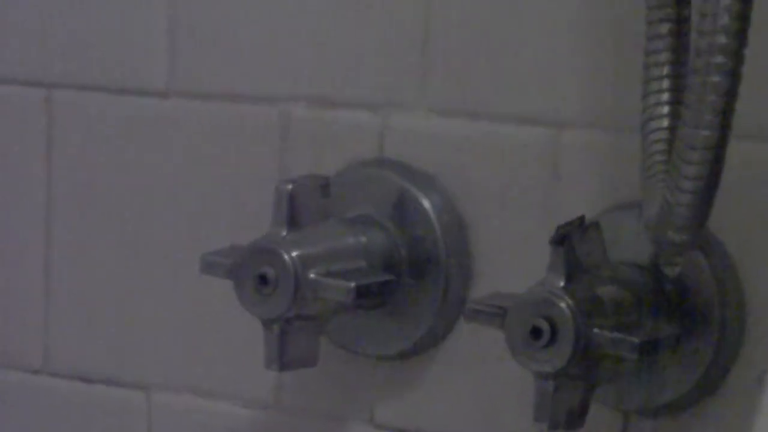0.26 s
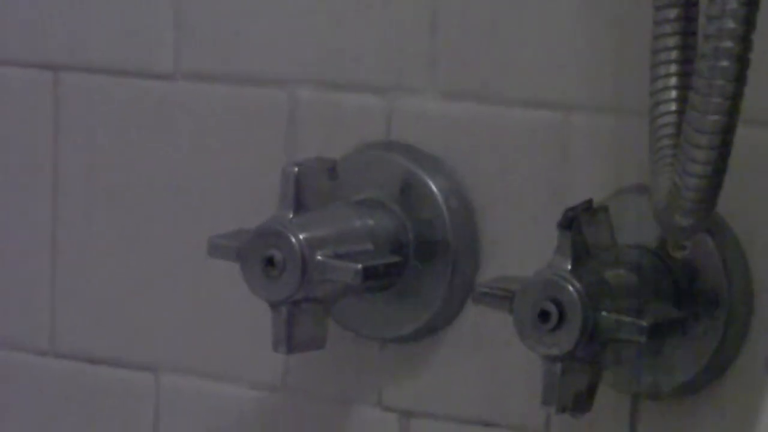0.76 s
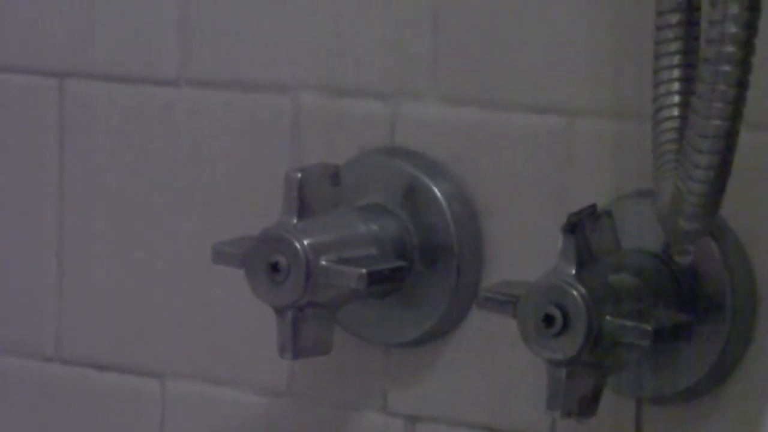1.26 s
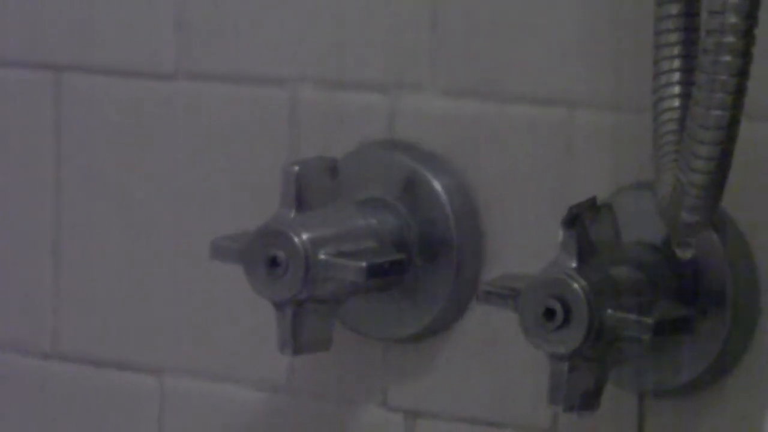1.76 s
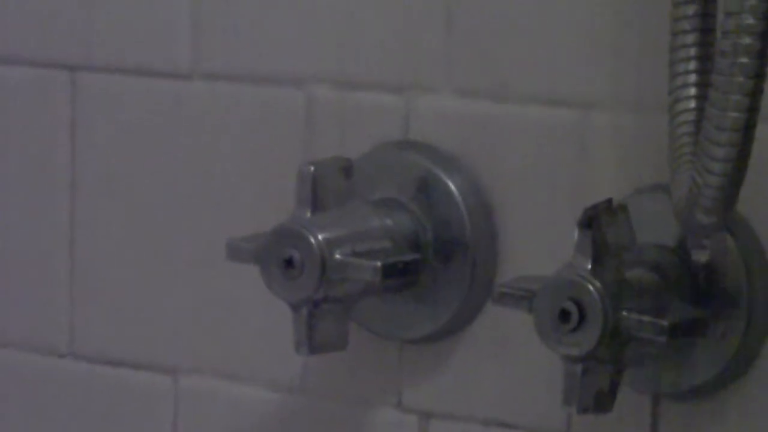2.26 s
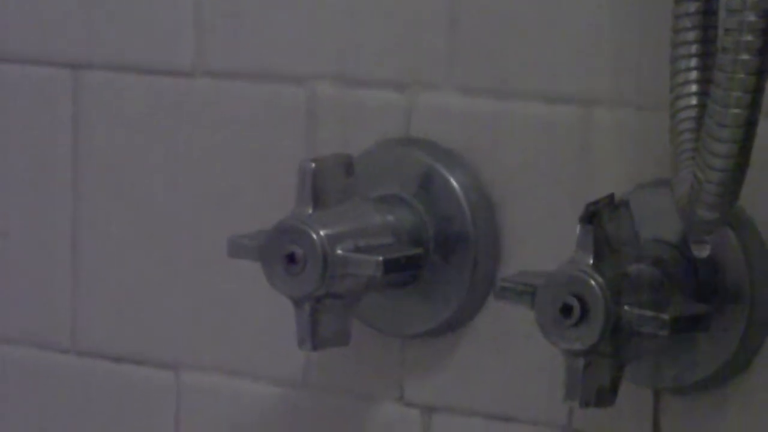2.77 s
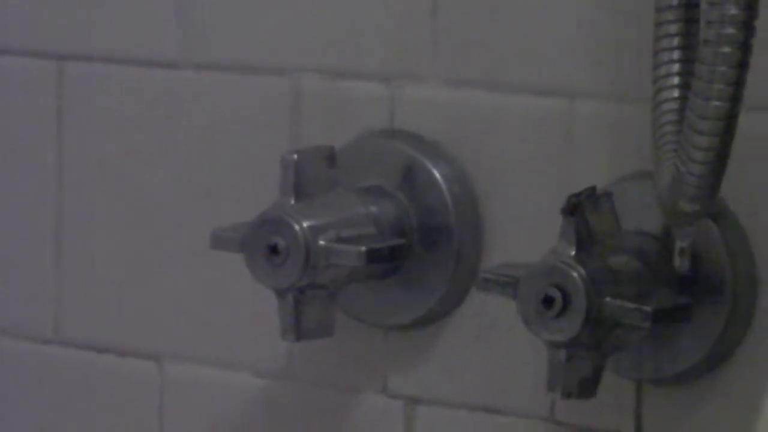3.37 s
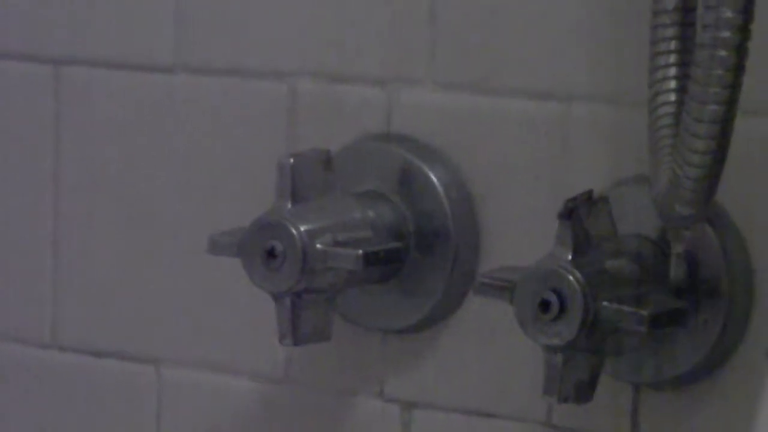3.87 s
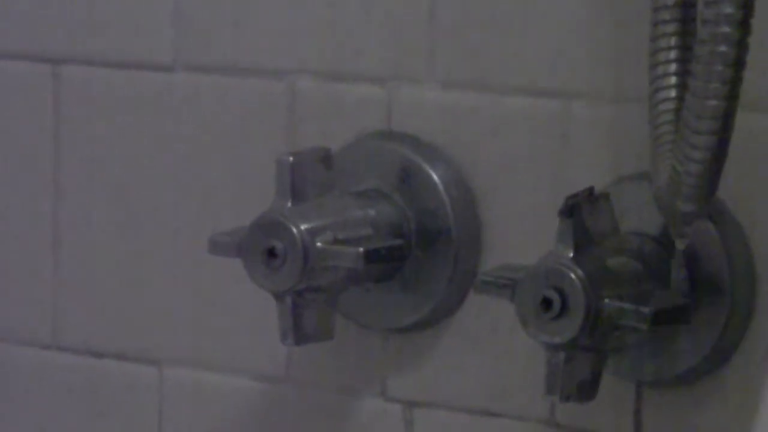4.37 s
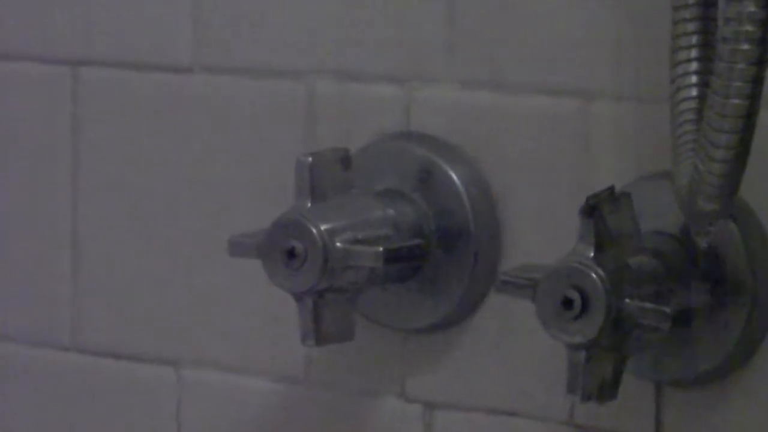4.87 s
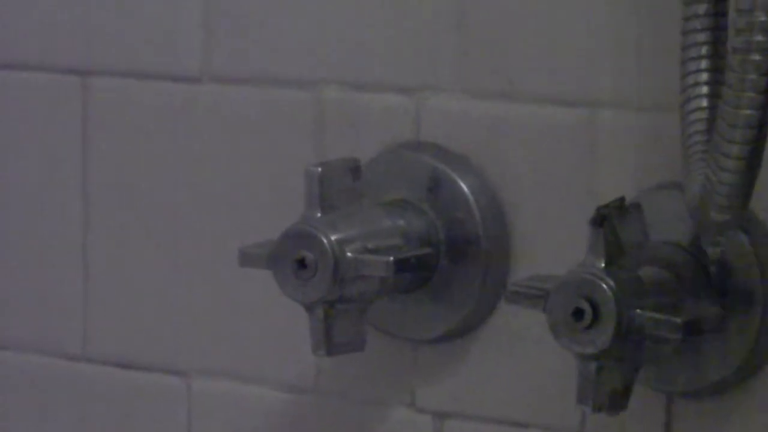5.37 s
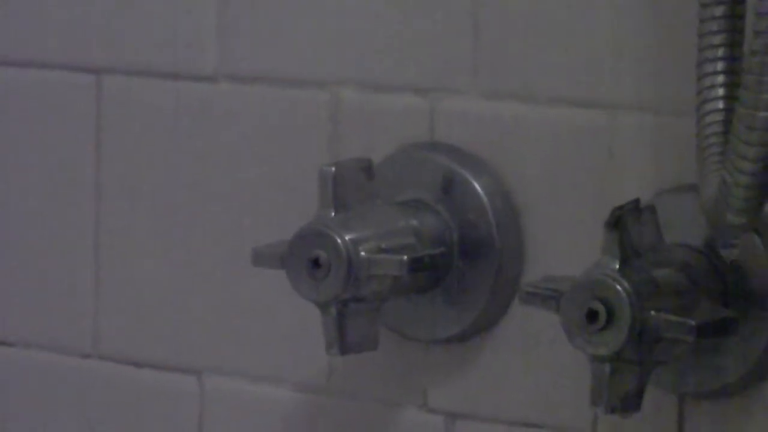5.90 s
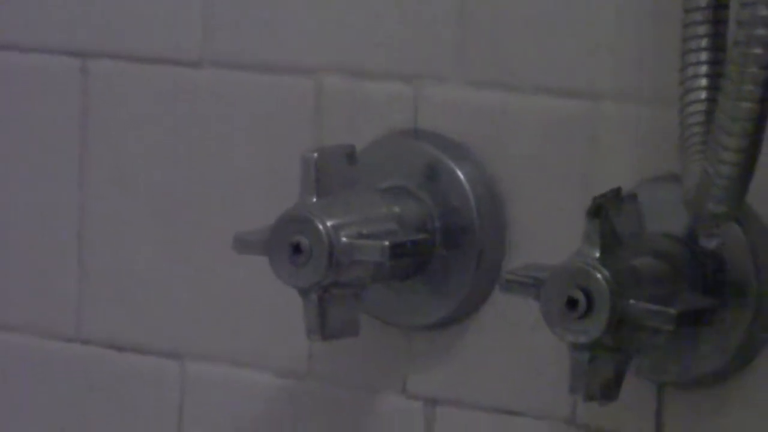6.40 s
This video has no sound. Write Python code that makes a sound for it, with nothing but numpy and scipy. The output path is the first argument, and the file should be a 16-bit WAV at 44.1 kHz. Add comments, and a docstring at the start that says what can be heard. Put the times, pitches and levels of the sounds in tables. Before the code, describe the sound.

Close, mono sound of water falling from a shower into a bathtub, with short hard echoes from tile walls smearing the spray into a hiss. Small bubbles splash, larger ones glug irregularly, and stray drops tick and plink. The stream stays steady for four seconds, then eases slightly, thinner and more gurgly, and continues running to the end without stopping.

```python
"""Shower into a tub

A shower runs into a tub in a small tiled bathroom, heard in mono from beside the taps.
Drops tick as random clicks, splash, and trap bubbles, decaying sines, in a puddle that glugs now and then.
Their weight drums the tub, clicks through its resonances; tile echoes smear the water into a hiss.
One flow curve drives the running layers: after four seconds it eases and the glugs stand out.
"""
import sys
import numpy as np
from scipy import signal
from scipy.fft import rfft, irfft
from scipy.io import wavfile

SR = 44100
rng = np.random.default_rng(int(sys.argv[2]) if len(sys.argv) > 2 else 0)


def put_to_file(sound):
    """Save the sound as 16-bit audio at rate SR, in the file named by the first command-line argument."""
    columns = np.atleast_2d(sound).T  # one column per channel
    safe = np.clip(columns, -1, 1)
    whole_steps = np.round(safe * 32767)
    wavfile.write(sys.argv[1], SR, whole_steps.astype(np.int16))


N = 292824
TIME = np.arange(N) / SR
SPOTS = 6  # places where the water lands, each with its own echoes


def undb(db):
    """Decibels to gain."""
    return 10 ** (np.asarray(db) / 20)


def colour(x, points, modes=()):
    """Causal minimum-phase filter through (Hz, dB) points, with resonances standing on top."""
    size = 2 ** 14
    hz = np.maximum(np.arange(size // 2 + 1) * SR / size, 1)
    at_hz, db = np.transpose(points)
    power = undb(np.interp(np.log(hz), np.log(at_hz), db)) ** 2
    peaks = 1
    for mode_hz, width_hz, height_db in modes:
        detune = 2 * (hz - mode_hz) / width_hz
        peaks = peaks + (undb(height_db) ** 2 - 1) / (1 + detune ** 2) ** 2
    log_gain = np.log(np.maximum(power * peaks, 1e-12)) / 2
    # folding the cepstrum onto positive times makes the filter causal
    cepstrum = irfft(log_gain)[:size // 2]
    cepstrum[1:] *= 2
    response = irfft(np.exp(rfft(cepstrum, size)))
    return signal.fftconvolve(x, response)[:N]


def highpass(x, hz):
    """Steep low cut."""
    return signal.sosfilt(signal.butter(4, hz, "highpass", fs=SR, output="sos"), x)


def unit(x, band):
    """Scale to rms 1 within a band (Hz, Hz)."""
    hz = np.arange(N // 2 + 1) * SR / N
    inside = rfft(x)[(hz > band[0]) & (hz < band[1])]
    return x * N / np.sqrt(2 * np.sum(np.abs(inside) ** 2))


def add(out, s, sound):
    """Mix a sound in at a time in seconds."""
    start = int(np.clip(s * SR, 0, N - 1))
    out[start:start + len(sound)] += sound[:N - start]


def tiles(x, wet_db):
    """Direct sound plus the dense echo of close tiled walls; the treble dies first."""
    t60_s, treble_t60_s = 0.45, 0.27
    t = TIME[:SR // 2]
    noise = rng.standard_normal(len(t))
    low = signal.sosfilt(signal.butter(1, 4000, fs=SR, output="sos"), noise)
    treble = noise - low
    tail = low * undb(-60 * t / t60_s) + treble * undb(-60 * t / treble_t60_s)
    tail = tail * (t > .003)  # the echo waits 3 ms
    echo = signal.fftconvolve(x, tail / np.linalg.norm(tail))[:N]
    return x + undb(wet_db) * echo


def impacts(per_s, spread_db):
    """Clicks at random moments, many small and a few large."""
    chance = rng.random(N)
    size = np.clip(rng.standard_normal(N), -2.5, 2.5)
    sign = rng.choice([-1, 1], N)
    return (chance < per_s / SR) * undb(spread_db * size) * sign


def bubble(hz, cycles, rise):
    """A trapped bubble swells within a cycle and rings on, its pitch rising as it nears the surface."""
    # age 1 is the nominal life, where the ring is down 26 dB; it sounds for twice that
    age = np.arange(int(2 * cycles * SR / hz) + 2) * hz / (cycles * SR)
    swell = 1 - np.exp(-2 * cycles * age)
    ring = np.sin(2 * np.pi * cycles * age * (1 + rise * age / 2))
    return swell * np.exp(-3 * age) * ring


def bubbles(band, cycles, rise, spread_db, count):
    """A swarm of bubbles of random pitch, life and size."""
    out = np.zeros(N)
    for when, pitch, life, size, sign in rng.random((count, 5)):
        hz = band[0] * (band[1] / band[0]) ** pitch
        size_db = -spread_db * np.log(size + .01)
        # short high rings need more height to carry the same power per Hz
        height = np.sign(sign - .5) * hz * undb(size_db)
        add(out, when * N / SR, height * bubble(hz, cycles * (.5 + life), rise))
    return out


def clumps(per_s, depth_db):
    """Uneven gain gliding between random levels, as when a jet breaks up and its drops clump."""
    knots = rng.standard_normal(2000)
    return undb(depth_db * np.interp(TIME * per_s, np.arange(len(knots)), knots))


def eased(x, full, gentle):
    """Glide from the colour of the full flow to that of the gentler one, landing on other water."""
    share = np.interp(TIME, (4.3, 4.55), (0, 1))  # seconds
    return (1 - share) * colour(x, full) + share * colour(x, gentle)


def falling_water():
    """Strength of the falling water in dB: steady, a brief swell and sag, then a gentler flow."""
    # strength against full flow: (time [s], level [dB])
    strength = [(0, 0), (3.7, -.1), (4.14, 0.9), (4.3, -2.3), (4.5, -2), (4.7, -3), (5.0, -1.5),
                (5.35, -2.5), (5.75, -2), (6.64, -2.5)]
    return np.interp(TIME, *np.transpose(strength))


def spray():
    """Countless fine drops tick on the wet surface, and tiny bubbles fizz among them."""
    # tone of the drops on the wet surface: (frequency [Hz], level [dB])
    spray_tone = [(60, -60), (300, -38.5), (700, -17), (1200, 1), (2400, 3), (3500, 0.5), (4500, -0.5),
                  (6000, -2), (7500, -4.5), (9000, -7), (12000, -13.5), (15000, -35)]
    treble, pitches = (3800, 15000), (3000, 14000)  # Hz
    out = 0
    for _ in range(SPOTS):
        ticks = unit(impacts(per_s=3600, spread_db=4.5), treble)
        fizz = unit(bubbles(pitches, cycles=11.5, rise=0.16, spread_db=3.5, count=1600), treble)
        ticking = ticks * clumps(per_s=45, depth_db=3.0)
        fizzing = undb(-1.0) * fizz * clumps(per_s=35, depth_db=3.0)
        out = out + tiles(ticking + fizzing, wet_db=-1.5)
    return unit(colour(out, spray_tone), treble)


def splash():
    """The jets churn the water film into small, short-lived bubbles."""
    # tone of the splashing film at full flow: (frequency [Hz], level [dB])
    full_tone = [(200, -45), (900, -18.5), (1720, -8.5), (1890, 2), (2080, 3), (2290, -0.5), (2430, 2),
                 (3100, -2.5), (4000, -12.5), (7000, -15.5)]
    # tone of the film under the eased flow: (frequency [Hz], level [dB])
    gentle_tone = [(200, -51), (900, -26), (1820, -2.5), (2000, 0.5), (2170, 2.5), (2300, -3), (2430, 3.5),
                   (2660, -4.5), (2810, 1), (3300, -4.5), (3520, -1.5), (3750, -6.5), (7000, -24.5)]
    band, pitches = (1750, 3500), (1400, 5000)  # Hz
    heard = 0
    for _ in range(SPOTS):
        swarm = bubbles(pitches, cycles=15.0, rise=0.29, spread_db=3.5, count=1200)
        heard = heard + tiles(swarm * clumps(per_s=30, depth_db=0.5), wet_db=0.5)
    return unit(eased(heard, full_tone, gentle_tone), band)


def gurgle():
    """Where the water pools, larger bubbles ring lower and longer."""
    # tone of the puddle at full flow: (frequency [Hz], level [dB])
    full_tone = [(500, -47), (680, -23), (780, -6), (860, -10.5), (1000, -1), (1100, -5), (1210, 2.5),
                 (1310, -1), (1450, 2.5), (1700, -3.5), (2300, -29.5)]
    # tone of the puddle under the eased flow: (frequency [Hz], level [dB])
    gentle_tone = [(500, -27.5), (700, -16.5), (850, -10), (930, -3.5), (1070, -0.5), (1180, 0), (1310, -3),
                   (1460, 2.5), (1700, -7), (2300, -25)]
    band, pitches = (800, 1650), (620, 1900)  # Hz
    heard = 0
    for _ in range(SPOTS):
        swarm = bubbles(pitches, cycles=17.1, rise=0.14, spread_db=2.5, count=800)
        heard = heard + tiles(swarm, wet_db=0.0)
    return unit(eased(highpass(heard, 275), full_tone, gentle_tone), band)


def tub():
    """The patter drums on the tub floor and rings the low modes of tub and room."""
    # tone of the tub under the falling water: (frequency [Hz], level [dB])
    tub_tone = [(25, -50), (45, -37), (75, -32), (130, -22), (200, -18), (235, -6), (330, -0.5), (500, 2),
                (700, 2), (900, 2.5), (1500, -7.5)]
    # resonances of tub and room: (frequency [Hz], width [Hz], height above the rest [dB])
    resonances = [(98.7, 13.4, 12.5), (163.4, 34, 8), (219.6, 13.4, 9.5), (264.7, 6.2, 12.5), (322, 12, 6),
                  (431.4, 7.8, 9.5), (445.7, 9.4, 10), (552.7, 15.6, 10), (600, 35, 2.5)]
    return unit(colour(impacts(per_s=2500, spread_db=3), tub_tone, resonances), (200, 700))


def stray_drops(count):
    """Rows (s, Hz, dB, cycles) of lesser drops at random moments and pitches."""
    low_hz, high_hz = 900, 11000
    rows = []
    for when, pitch, size in rng.random((count, 3)):
        hz = low_hz * (high_hz / low_hz) ** pitch
        level_db = -30 + 6 * (size - .5)
        rows.append((when * N / SR, hz, level_db, 28))
    return rows


def heavy_drops():
    """Single fat drops, and a few low, long rings from the puddle once the flow eases: each a short smack and
    the plink of a bubble; too small to radiate any bass."""
    # drops that stand out, and the low, long rings of the pooled water near 4.56, 4.7, 4.88, 5.1 and 5.15 s:
    # (time [s], pitch [Hz], plink level [dB], ring [cycles])
    stand_outs = [(.069, 4670, -13.5, 17), (.615, 770, -26, 29), (1.065, 1187, -20, 29),
                  (1.495, 798, -28, 24), (2.005, 2880, -12, 16), (2.049, 7140, -11, 14),
                  (2.35, 1990, -13.5, 20), (3.381, 1990, -17.5, 20), (4.56, 945, -22.5, 24),
                  (4.7, 917, -24.5, 48), (4.858, 4240, -19, 17), (4.882, 960, -24.5, 36),
                  (4.948, 1150, -26, 25), (5.096, 1165, -23, 28), (5.145, 1550, -19.5, 38),
                  (5.786, 4810, -14, 11), (5.882, 10300, -18, 25), (6.24, 4500, -13, 25),
                  (6.556, 1020, -21, 20)]
    smack_size, smack_decay_s = 0.24, .00068  # size against the plink, time constant
    out = np.zeros(N)
    for s, hz, db, cycles in stand_outs + stray_drops(count=28):
        plink = bubble(hz, cycles, rise=0.076)
        smack = rng.standard_normal(len(plink)) * np.exp(-TIME[:len(plink)] / smack_decay_s)
        add(out, s, undb(db) * (plink + smack_size * smack))
    return highpass(tiles(out, wet_db=-4.5), 590)


def bursts(events, attack_s, hold_s, release_s):
    """Gain of a row of (s, dB) bursts that share one attack, hold and release."""
    corners = np.cumsum([0, attack_s, hold_s, release_s])
    return sum(undb(db) * np.interp(TIME - s, corners, (0, 1, 1, 0)) for s, db in events)


def glugs():
    """Gain of the puddle's glugs, each a burst of large bubbles."""
    # glugs: (time [s], level [dB])
    glug_events = [(.47, -35), (.59, -32), (.67, -35), (1.41, -35), (2.13, -30), (2.24, -39), (2.53, -34),
                   (2.70, -31.5), (2.84, -31.5), (3.27, -34), (3.43, -31.5), (3.66, -32), (3.81, -30),
                   (4.55, -32), (4.70, -30), (4.92, -29), (5.06, -34), (5.24, -34), (5.66, -38),
                   (5.87, -36.5), (6.3, -35), (6.53, -33.5)]
    return bursts(glug_events, attack_s=0.013, hold_s=0.035, release_s=0.039)


def slaps():
    """Gain of the water slapping into the film, each slap a burst of small bubbles."""
    # slaps: (time [s], level [dB])
    slap_events = [(2.18, -28), (3.17, -29.5), (3.925, -27.5), (6.495, -29)]
    return bursts(slap_events, attack_s=0.0053, hold_s=0.021, release_s=0.072)


def scene():
    """The running layers follow the flow, the spray fully and puddle and tub least; the water wavers."""
    flow_db = falling_water()
    # base level at full flow [dB], then how far the layer follows the flow [dB per dB]
    spraying = undb(-30 + flow_db) * clumps(per_s=14, depth_db=0.41)
    splashing = undb(-30.5 + 0.98 * flow_db) * clumps(per_s=18, depth_db=0.9)
    pooling = undb(-34 + 0.4 * flow_db) * clumps(per_s=16, depth_db=1.16)
    drumming = undb(-44.1 + 0.49 * flow_db) * tub()
    # bursts add to the steady level as power
    water = spraying * spray()
    water = water + np.hypot(splashing, slaps()) * splash()
    water = water + np.hypot(pooling, glugs()) * gurgle()
    return np.tile(water + drumming + heavy_drops(), (2, 1))  # same sound on both channels


def record(dry):
    """A narrow notch thins the treble and a steep cut removes the top."""
    notch_hz, notch_floor, top_hz = (7755, 7955), .1, 15250  # floor is the gain left in the notch
    notched = signal.sosfilt(signal.butter(2, notch_hz, "bandstop", fs=SR, output="sos"), dry)
    heard = notched + notch_floor * (dry - notched)
    return signal.sosfilt(signal.ellip(12, .2, 80, top_hz, fs=SR, output="sos"), heard)


dry = scene()
out = record(dry)
put_to_file(out)
```